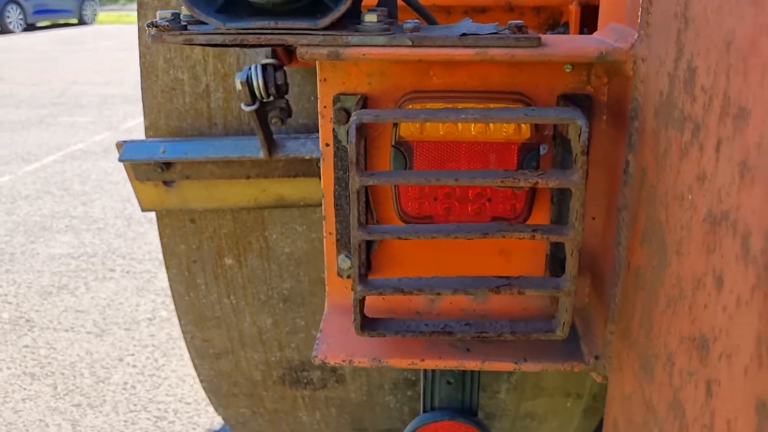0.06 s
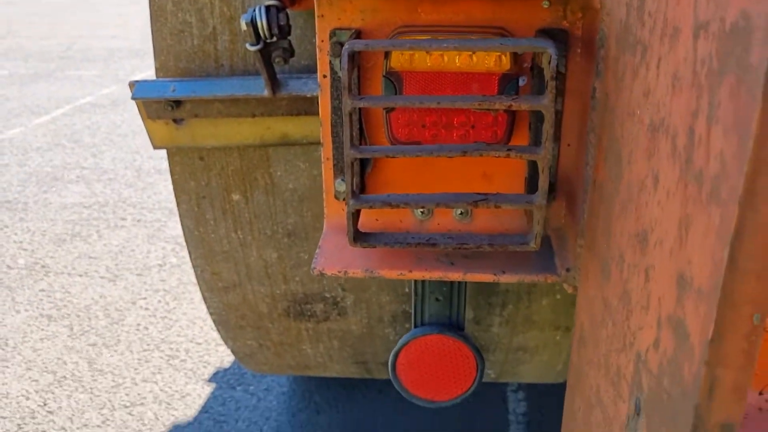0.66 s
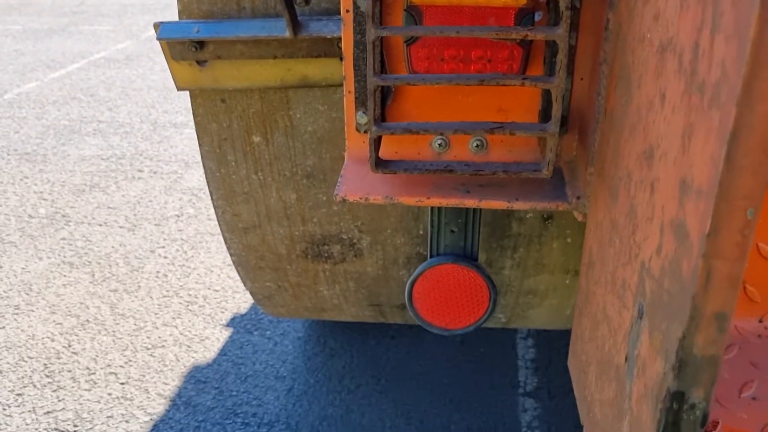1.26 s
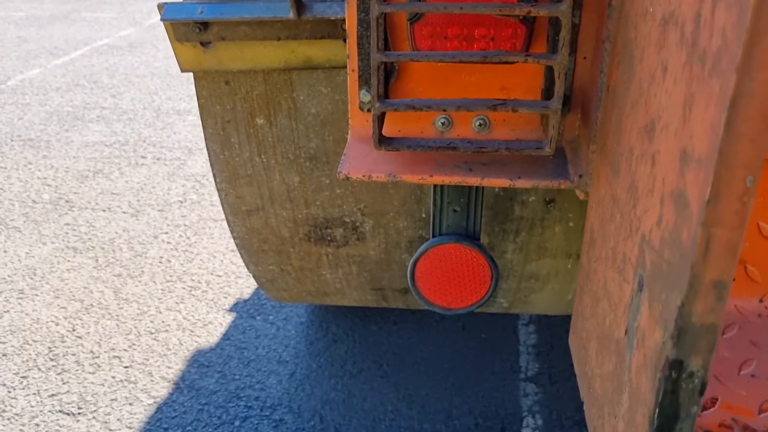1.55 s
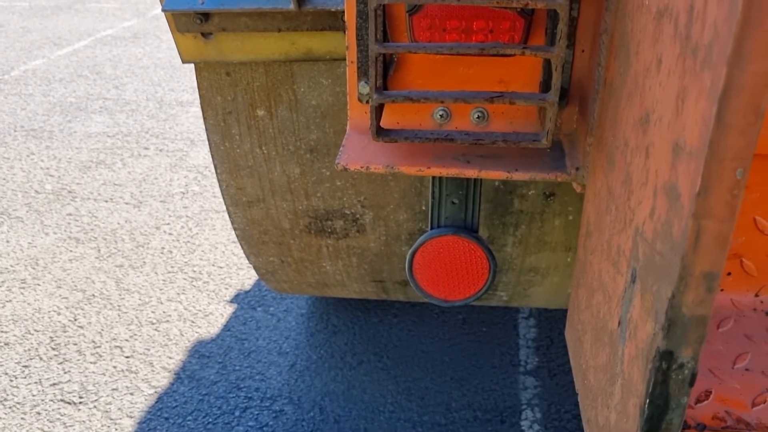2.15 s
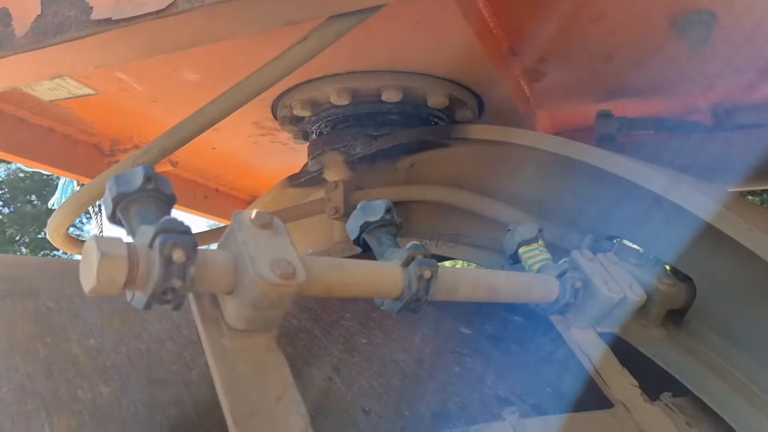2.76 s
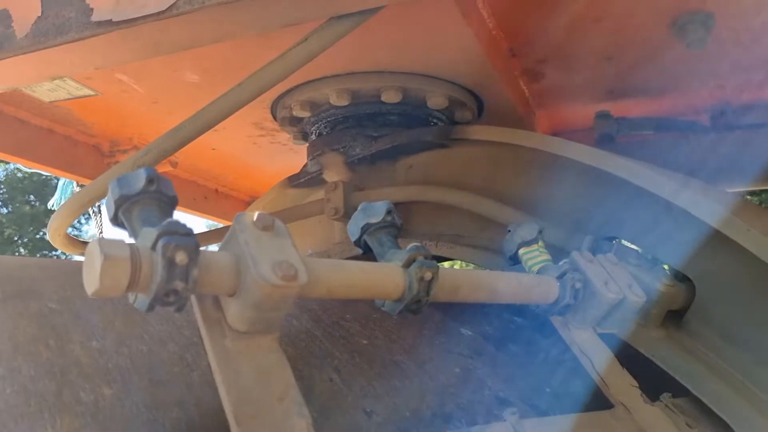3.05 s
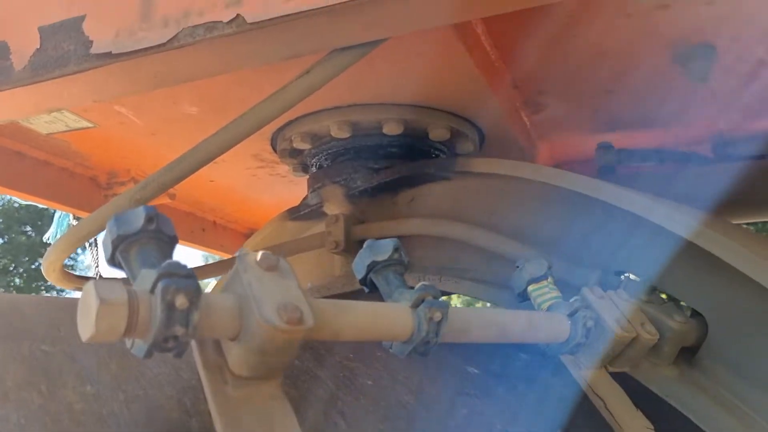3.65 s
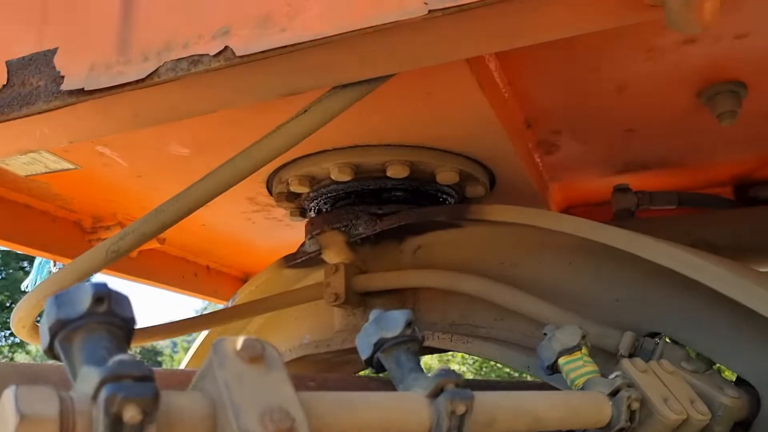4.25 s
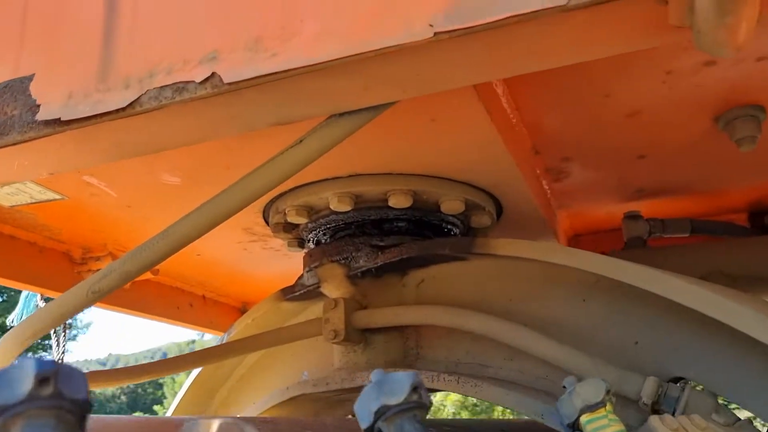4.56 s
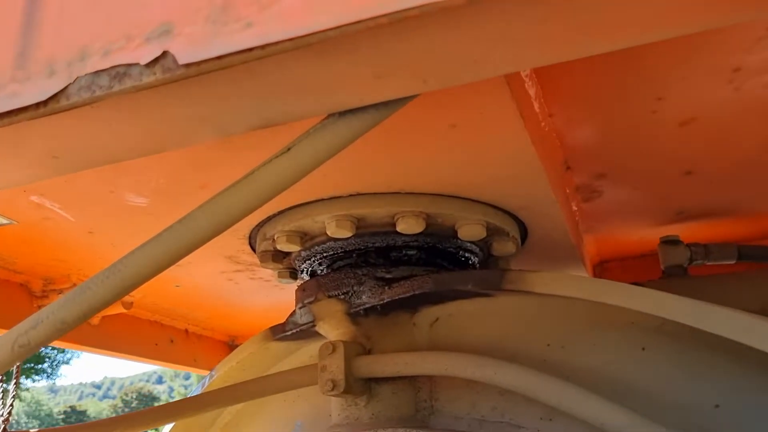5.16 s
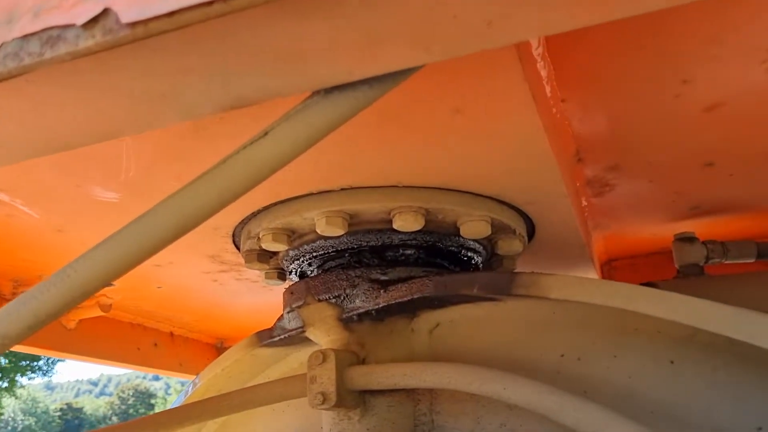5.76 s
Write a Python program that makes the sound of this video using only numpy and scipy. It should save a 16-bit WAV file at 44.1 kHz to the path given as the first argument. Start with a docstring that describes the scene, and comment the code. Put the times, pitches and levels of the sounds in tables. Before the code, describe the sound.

Close beside a road roller outdoors, its diesel engine idles with a throbbing rumble, light metallic knocking and a wavering fan whine. A faint whistle falls, and air hisses briefly. Just before halfway, a click cuts to beneath the frame, where the idle is duller and quieter. Its drone gradually swells as an airy rush grows brighter and rings in the steel cavities.

```python
"""A road roller's diesel engine idles outdoors: its firings make low tones, a roar and a metallic knock.
First we listen beside the drum, with a wavering fan tone, a thin falling whistle and a short hiss of air.
Then the scene changes with a click and we are under the frame. Here the idle is sheltered and dull, with
a swelling drone, while an airy rush grows, brightens and rings in the steel cavities."""
import sys
import numpy as np
from scipy import signal
from scipy.fft import rfft, irfft, next_fast_len
from scipy.io import wavfile

SR = 44100
rng = np.random.default_rng(int(sys.argv[2]) if len(sys.argv) > 2 else 0)


def store_pcm(level_fs):
    """Save levels as 16-bit WAV."""
    pcm = np.round(np.clip(level_fs, -1, 1) * 32767).astype(np.int16)
    wavfile.write(sys.argv[1], SR, np.atleast_2d(pcm).T)


N = 256220
TIME = np.arange(N) / SR
SIZE = next_fast_len(N)
HZ = np.maximum(np.arange(SIZE // 2 + 1) * SR / SIZE, 1)   # the frequencies of a spectrum
CRANK_HZ = 15.27   # engine turns per second at idle
CHANGE_S = 2.7345   # when the scene changes


def engine_beside(crank, gain, ears):
    """The exhaust pulses at multiples of the engine speed, over a rumble and a throbbing roar."""
    # Each row: multiple of the engine speed, starting level in dB, change in dB per second.
    exhaust_tones = [(3, -43, 0.3), (4.5, -43.5, 1), (7.5, -52, 2.5), (9, -39.5, -0.76), (14, -49.5, 3)]
    # Surges of the sixth multiple. Each row: peak time in seconds, length in seconds, level in dB.
    surges = [(.06, 0.047, -26.5), (.6, 0.1, -30), (1.09, 0.16, -34), (1.93, 0.09, -30),
              (2.14, 0.083, -32.5), (2.56, 0.2, -30.5)]
    # Each row of both: frequency in Hz, relative level in dB.
    rumble_colour = [(20, -26.5), (39, -17.5), (50, -0.5), (75, -1.5), (105, -3.5), (150, -6), (185, -6.5),
                     (215, -4.5), (245, -11), (270, -16), (330, -38.5)]
    roar_colour = [(230, -26.5), (290, -5), (340, -2.5), (430, 0.5), (560, 2.5), (680, -9.5), (820, -8.5),
                   (1100, -31)]
    hum = sum(ramp(level) * tone(multiple * crank, waver_db=2.5, blur_rad=0.26, rate_hz=3.8)
              for multiple, *level in exhaust_tones)
    surge = np.hypot(from_db(-41), bursts(surges, rise_db_per_s=70, fall_db_per_s=70))
    throb = surge * tone(6 * crank, waver_db=1.5, blur_rad=0.33, rate_hz=18)
    heave = rms_one(surge ** 0.091)   # the rumble follows the surges slightly
    rumble = gain["rumble"] * heave * noise(colour(rumble_colour), ears)
    roar = gain["roar"] * noise(colour(roar_colour), ears) * firing(crank, depth=0.17, count=3)
    return hear(hum + throb, ears) + rumble + roar


def engine_under(crank, gain, rush_db, ears):
    """The sheltered engine drones, makes the frame buzz and builds to a steady boom."""
    # Each row of both: multiple of the engine speed, relative level in dB.
    drone_tones = [(2, -8.5), (4, -17), (6, -0.5), (8, -6.5)]
    buzz_tones = [(12, -13), (14, -17), (15, -6.5), (16, -11), (22, -7.5), (24, -15.5), (34, -14),
                  (46, -6.5), (50, -22)]
    # Each row of both: frequency in Hz, relative level in dB.
    rumble_colour = [(20, -28), (39, -6), (54, 0.5), (66, 0.5), (82, 3), (112, 0), (140, -8), (170, -11),
                     (200, -29), (280, -38)]
    roar_colour = [(170, -13), (230, -1), (285, -12), (335, 0.5), (400, -8.5), (460, -5), (510, -3.5),
                   (570, -6.5), (690, -2.5), (800, -4.5), (1100, -23)]
    roar_gain = np.hypot(gain["roar"], from_db(rush_db + 12))   # roar and buzz grow with the rush
    drone = sum(from_db(db) * tone(multiple * crank, waver_db=2, blur_rad=0.62, rate_hz=2.2)
                for multiple, db in drone_tones)
    buzz = sum(from_db(db) * tone(multiple * crank, waver_db=4, blur_rad=0.4, rate_hz=3)
               for multiple, db in buzz_tones)
    boom = from_db(-41 - 7 * until(5.38)) * tone(10 * crank, waver_db=1, blur_rad=0.29, rate_hz=1.9)
    exhaust = hear(gain["drone"] * drone + roar_gain * buzz + boom, ears)
    rumble = gain["rumble"] * noise(colour(rumble_colour), ears)
    roar = roar_gain * noise(colour(roar_colour), ears) * firing(crank, depth=0.065, count=2)
    return exhaust + rumble + roar


def firing(crank, depth, count):
    """A gain that swells with each firing, count times per engine turn."""
    return 1 + depth * np.cos(2 * np.pi * count * crank)


def knocks(crank, decay_s, count, depth=0.28, uneven_db=3):
    """A gain that jumps as each firing jolts the metal, some harder than others."""
    stroke, progress = np.divmod(count * crank, 1)
    strength = from_db(uneven_db * rng.standard_normal(size=400))[stroke.astype(int)]
    return rms_one(1 + depth * strength * np.exp(-progress / (count * CRANK_HZ * decay_s)))


def diesel_chatter(crank, gain, ears):
    """Engine parts hiss and chatter with the diesel knock; a few clacks stand out."""
    # Each row: frequency in Hz, relative level in dB.
    hiss_colour = [(700, -29), (950, 2), (1150, -2), (1350, -5), (1700, -10.5), (2300, -20), (3200, -16),
                   (4500, -26.5), (7000, -33.5), (8500, -44), (10000, -49), (15000, -53.5)]
    # Each row: time in seconds, level in dB.
    clack_times = [(0.199, -55), (0.266, -57), (0.296, -56), (0.484, -59), (0.712, -55), (1.248, -56),
                   (1.82, -57), (2.27, -56), (2.468, -54.5)]
    knock = knocks(crank, decay_s=0.007, count=3)
    hiss = gain["hiss"] * noise(colour(hiss_colour), ears) * knock ** 0.7
    clacks = bursts([(s, 0.0044, db) for s, db in clack_times], rise_db_per_s=1105.5, fall_db_per_s=1105.5)
    chatter = (gain["chatter"] * knock ** 2 + clacks) * noise(resonance(hz=1850, width_hz=540), ears)
    return hiss + chatter


def drum_swell(ears):
    """The middle range of the roar opens up as the drum comes near, then holds."""
    # Each row: frequency in Hz, relative level in dB.
    swell_colour = [(290, -12), (340, -2), (430, 0), (480, -8.5), (570, 8.5), (650, -4.5), (850, -6.5),
                    (1100, -6.5), (1400, -14.5), (2200, -29)]
    return from_db(-36 - 12 * until(2.655)) * noise(colour(swell_colour), ears)


def panel(ears):
    """A panel rings with the roar, then fades as the listener sinks."""
    return from_db(-53.5 - 12.5 * since(0.69)) * noise(resonance(hz=695, width_hz=150), ears)


def fan(ears):
    """Cooling fan blades whine on a tone and its octave, roughened by the air they churn."""
    # Each row: time in seconds, pitch of the octave in Hz, level of the lower tone in dB.
    fan_course = [(0.0, 470.7, -45), (0.85, 476.5, -39), (1.4, 473.3, -43), (2.3, 466.7, -45.5),
                  (2.7, 470, -42)]
    # Each row: time in seconds, level of the octave in dB.
    octave_levels = [(0.0, -39), (0.58, -30), (1.0, -36.5), (1.1, -32), (1.18, -42.5), (1.28, -31),
                     (1.7, -53), (2.28, -49.5), (2.4, -38.5), (2.7, -38)]
    octave_hz, blade_db = read(fan_course)
    octave_db, = read(octave_levels)
    cycles = np.cumsum(octave_hz / 2) / SR
    blade = from_db(blade_db) * tone(cycles, waver_db=1.5, blur_rad=0.047, rate_hz=1.6)
    octave = from_db(octave_db) * tone(2 * cycles, waver_db=1.5, blur_rad=0.74, rate_hz=7.5)
    return hear(blade + octave, ears)


def rush(rush_db):
    """An airy rush sets the steel cavities ringing."""
    # Each row: frequency in Hz, relative level in dB.
    rush_colour = [(1500, -13), (2200, -5.5), (2700, -9.5), (3300, -5), (4200, -11), (5050, -3.5),
                   (5400, -3.5), (6100, -15), (7300, -9), (8300, -18), (11000, -21), (15500, -21)]
    # Each row: ringing pitch in Hz, width in Hz, boost in dB.
    steel_rings = [(1170, 50, 26), (1340, 44, 23), (1700, 34, 11), (2156, 24, 15), (2350, 44, 9),
                   (2464, 40, 11), (2580, 60, 6), (2900, 40, 7), (3110, 50, 4), (3955, 24, 11),
                   (4130, 44, 14), (4294, 30, 9), (4300, 450, 2), (5503, 24, 6), (5676, 24, 9),
                   (5900, 600, 2.5), (6130, 30, 12), (6950, 140, 4)]
    # Each row: frequency in Hz, likeness of the ears (0-1), left lead in radians, left over right in dB.
    stereo = [(1200, .85, 3.5, -1), (2050, .7, 6.3, -1.5), (2750, .78, 9.2, -1), (3300, .35, 10.3, -1),
              (4100, .65, 12.6, -1.3), (5100, .72, 15.7, -1), (6100, .65, 18.8, -1), (7100, .6, 21.9, -1),
              (16000, .45, 48, -1.2)]
    steel = 1 + sum((from_db(db) - 1) * resonance(hz, width) for hz, width, db in steel_rings)
    return from_db(rush_db + 15.5) * noise(colour(rush_colour) * steel, ear_gains(stereo))


def flares(ears):
    """One gap in the frame after another catches the rush and rings at its own pitch."""
    # Each row: peak time in seconds, length in seconds, level in dB, pitch in Hz, width in Hz.
    gaps = [(4.0, 0.02, -65, 2450, 400), (4.32, 0.25, -63.5, 2580, 240), (4.5, 0.055, -58.5, 2480, 300),
            (4.42, 0.43, -60.5, 2330, 380), (4.767, 0.017, -54.5, 2420, 240), (4.6, 0.6, -68, 4200, 700),
            (5.2, 0.08, -68, 4150, 200), (4.95, 0.22, -63, 1880, 350), (5.33, 0.12, -55, 4210, 110),
            (5.55, 0.11, -54, 4120, 130), (5.35, 0.2, -59, 2360, 240)]
    return sum(bursts([burst], rise_db_per_s=128, fall_db_per_s=112) * noise(resonance(hz, width), ears)
               for *burst, hz, width in gaps)


def hollow():
    """The hollow under the frame murmurs, then sings a rough, airy tone that grows and sinks in pitch."""
    # One row: frequency in Hz, likeness of the ears (0-1), left lead in radians, left over right in dB.
    stereo = [(670, 1, 1.6, 0)]
    start_s, idle_db = 5.28, -67.5
    hz = 697 - 100 * since(start_s)
    sing_db = -54 + 19.5 * since(start_s) - 60 * until(start_s)
    sing = from_db(sing_db) * tone(np.cumsum(hz) / SR, waver_db=3.5, blur_rad=0.5, rate_hz=20)
    murmur_gain = np.hypot(from_db(idle_db), from_db(sing_db - 3.5))
    murmur = murmur_gain * np.array([narrow_noise(hz, width_hz=134) for ear in "LR"])
    return murmur + hear(sing, ear_gains(stereo))


def high_hisses(ears):
    """A short hiss of escaping air; later, a brief high hiss just before the click at the scene change."""
    # Each row: peak time in seconds, length in seconds, level in dB. Only the first two are escaping air.
    hisses = [(2.02, 0.58, -72), (2.16, 0.16, -59.5), (2.7, 0.026, -60)]
    # Each row: frequency in Hz, relative level in dB.
    hiss_colour = [(2200, -8), (3000, 19.5), (4300, -5), (6000, 3), (8400, -5), (10000, -14), (10900, -6),
                   (11250, 6), (11700, -8), (12200, -11), (14000, -11), (16000, -14)]
    return bursts(hisses, rise_db_per_s=221, fall_db_per_s=135) * noise(colour(hiss_colour), ears)


def rasps(ears):
    """Short, grainy scrapes of treble."""
    # Each row: peak time in seconds, length in seconds, level in dB.
    scrapes = [(4.37, 0.015, -62), (4.695, 0.027, -59.5), (5.35, 0.036, -52)]
    # Each row: frequency in Hz, relative level in dB.
    rasp_colour = [(3500, -3), (4300, 11), (6300, -1), (9000, -13)]
    grain = rms_one(from_db(3.5 * drift(rate_hz=130)))
    return bursts(scrapes, rise_db_per_s=450, fall_db_per_s=450) * grain * noise(colour(rasp_colour), ears)


def whistle():
    """A soft, airy whistle holds its pitch, runs down, and sounds clearly just before it stops."""
    start_hz, floor_hz, stop_db_per_s = 12000, 5400, 91.5
    falling_s = since(0.97)
    hz = floor_hz + (start_hz - floor_hz) * np.exp(-falling_s / 1.62)
    airy = from_db(-82 - 4.5 * falling_s + 1.5 * drift(rate_hz=12) - stop_db_per_s * since(2.36))
    clear = bursts([(2.23, 0.04, -74)], stop_db_per_s, stop_db_per_s)
    return np.array([airy * (narrow_noise(hz, width_hz=450) + narrow_noise(hz, width_hz=1600))
                     + clear * narrow_noise(hz, width_hz=90) for ear in "LR"])


def beside_drum(crank):
    """All that is heard beside the drum; the listener sinks slowly, so the layers change evenly."""
    # Each row: frequency in Hz, likeness of the ears (0-1), left lead in radians, left over right in dB.
    stereo = [(30, .98, .1, -2.2), (110, .96, .1, -2.2), (150, .8, 0, -2), (185, .55, .3, -3),
              (235, .82, 1.1, -5.5), (290, .55, 2.4, 2), (345, .5, .3, 8), (430, .88, .5, 3),
              (475, .97, .5, -5), (540, .88, 2.3, -3), (680, .9, 2.6, 2), (800, .6, 1.5, 1),
              (930, .9, 2.8, -1), (1500, .88, 3.7, -2), (2150, .5, 6.3, -1), (3200, .42, 9.7, 1),
              (16000, .5, 48.5, -1.5)]
    # Each layer: starting level in dB, change in dB per second.
    levels = {"rumble": (-38.5, 2.06), "roar": (-35.5, -2.76), "hiss": (-51, -0.46), "chatter": (-65, -1.2)}
    ears = ear_gains(stereo)
    gain = {layer: ramp(level) for layer, level in levels.items()}
    body = engine_beside(crank, gain, ears) + panel(ears) + drum_swell(ears)
    treble = echoes(diesel_chatter(crank, gain, ears) + high_hisses(ears), wet=0.23, sway_ms=0.18, count=6)
    return body + treble + fan(ears) + whistle()


def under_frame(crank):
    """All that is heard under the frame; the layers grow as the listener rises out of shelter."""
    # Each row: frequency in Hz, likeness of the ears (0-1), left lead in radians, left over right in dB.
    stereo = [(30, .9, 0, -2), (45, .6, .3, 2), (65, .87, .2, 0), (92, .97, .4, -1), (120, .78, .6, -1),
              (152, .92, .5, -2), (185, .87, .5, 0), (240, .94, .6, -3), (290, .55, 1.3, -2),
              (340, .63, 2, -1), (470, .6, 1.6, 0), (620, .82, 2.7, 0), (1400, .84, 3.6, -1),
              (2150, .58, 6.3, -1.5), (4200, .48, 12.6, -1.3), (16000, .45, 48, -1.2)]
    # Each layer: level in dB at the scene change, change in dB per second.
    levels = {"drone": (-50, 2.24), "rumble": (-46.5, 0.83), "roar": (-62, 4.03), "hiss": (-60, 2.94)}
    # Each row: time in seconds, relative strength of the rush in dB.
    rush_levels = [(2.8, -107), (3.01, -107), (4.39, -78.5), (5.09, -78), (5.25, -71.5), (5.34, -65.5),
                   (5.6, -60), (5.73, -61), (5.81, -64)]
    # Each row: frequency in Hz, relative level in dB.
    hiss_colour = [(700, -10), (950, -1.5), (1350, -1), (1700, -8.5), (2500, -9), (3300, -9), (4300, -16),
                   (6000, -20), (7600, -25), (8500, -41.5), (12000, -49), (15000, -53)]
    ears = ear_gains(stereo)
    gain = {layer: ramp(level, CHANGE_S) for layer, level in levels.items()}
    rush_db, = read(rush_levels)
    engine = engine_under(crank, gain, rush_db, ears)
    hiss = gain["hiss"] * noise(colour(hiss_colour), ears)
    clatter = knocks(crank, decay_s=0.009, count=2)
    treble = echoes(hiss + clatter * rush(rush_db), wet=0.33, sway_ms=0.25, count=8)
    treble += clatter * flares(ears) + rasps(ears)
    return engine + hollow() + treble * from_db(0.44 * drift(rate_hz=12))   # the treble flickers


def echoes(x, wet, sway_ms, count):
    """Sound bounces off nearby steel plates; the short delays shift as the listener sways."""
    sway = sway_ms * drift(rate_hz=0.45)
    lags_ms = rng.uniform(1.5, 9, count)
    directions = rng.uniform(-1, 1, count)
    signs = rng.choice([-1, 1], count)
    out = x
    for lag_ms, towards, sign in zip(lags_ms, directions, signs):
        sent_s = TIME - (lag_ms + towards * sway) / 1000
        out = out + sign * wet / np.sqrt(count) * np.array([np.interp(sent_s, TIME, side) for side in x])
    return out / np.sqrt(1 + wet ** 2)


def ear_gains(stereo):
    """Left and right gains for direct sound, and for scattered sound that the ears do not share."""
    alike, lead, balance_db = read(stereo, HZ)
    alike = np.clip(alike, 0, 1)
    sides = np.array([from_db(balance_db / 2), from_db(-balance_db / 2) * np.exp(-1j * lead)])
    direct = sides * np.sqrt((1 + alike) / 2)
    scattered = sides * np.sqrt((1 - alike) / 2) * [[1], [-1]]
    return direct, scattered


def hear(x, ears):
    """Sound from one spot goes straight to both ears."""
    return irfft(ears[0] * rfft(x, SIZE), SIZE)[:, :N]


def tone(cycles, waver_db, blur_rad, rate_hz):
    """A tone whose strength and phase waver on the way through moving air."""
    strength = np.sqrt(2) * rms_one(from_db(waver_db * drift(rate_hz)))
    return strength * np.sin(2 * np.pi * cycles + blur_rad * drift(rate_hz))


def noise(gain, ears):
    """Shaped stereo noise; the audible part that both ears share has a strength of 1."""
    spectrum = gain * sum(path * rfft(rng.standard_normal(SIZE)) for path in ears)
    common = irfft(spectrum.mean(axis=0) * (HZ > 20) * (HZ < 16000), SIZE)
    return irfft(spectrum, SIZE)[:, :N] / common.std()


def narrow_noise(hz, width_hz):
    """A narrow band of noise around a moving pitch."""
    phase = 2 * np.pi * np.cumsum(hz) / SR
    return drift(width_hz / 2) * np.cos(phase) + drift(width_hz / 2) * np.sin(phase)


def colour(points):
    """Gain at every frequency from a few points, falling 24 dB per octave past the ends."""
    hz, db = np.transpose(points)
    octaves_beyond = np.maximum(np.log2(HZ / hz[-1]), 0) + np.maximum(np.log2(hz[0] / HZ), 0)
    return from_db(np.interp(np.log(HZ), np.log(hz), db) - 24 * octaves_beyond)


def resonance(hz, width_hz):
    """A peak of gain around one ringing pitch, 1 on top."""
    return 1 / (1 + ((HZ ** 2 - hz ** 2) / (HZ * width_hz)) ** 2)


def drift(rate_hz):
    """A smooth random wobble with a spread of 1."""
    spectrum = rfft(rng.standard_normal(SIZE // 8))
    return rms_one(irfft(spectrum / (1 + (HZ[:len(spectrum)] / rate_hz) ** 4), SIZE)[:N])


def bursts(rows, rise_db_per_s, fall_db_per_s):
    """Gain of events that rise to a peak, hold and die away."""
    return np.max([from_db(db - rise_db_per_s * until(peak_s) - fall_db_per_s * since(peak_s + hold_s))
                   for peak_s, hold_s, db in rows], axis=0)


def ramp(level, start_s=0):
    """Gain that changes evenly in decibels."""
    db, db_per_s = level
    return from_db(db + db_per_s * since(start_s))


def read(rows, at=TIME):
    """Each later column of a table, joined by straight lines along the first."""
    first, *columns = np.transpose(rows)
    return [np.interp(at, first, column) for column in columns]


def since(start_s):
    """Seconds since a moment, 0 before it."""
    return np.maximum(TIME - start_s, 0)


def until(end_s):
    """Seconds left until a moment, 0 after it."""
    return np.maximum(end_s - TIME, 0)


def from_db(db):
    """Decibels to gain."""
    return 10 ** (np.asarray(db) / 20)


def rms_one(x):
    """Scale to an average strength (rms) of 1."""
    return x / np.sqrt(np.mean(x ** 2))


def scene():
    """One engine drives both scenes; in the second it starts a little faster and settles."""
    extra_hz = (TIME > CHANGE_S) * 0.55 * np.exp(-since(CHANGE_S) / 0.99)
    speed_hz = (CRANK_HZ + extra_hz) * (1 + 0.0026 * drift(rate_hz=2.8))
    crank = np.cumsum(speed_hz) / SR   # engine turns so far
    click = np.exp(-np.abs(TIME - CHANGE_S) / 0.001)   # the pressure jumps as the scene changes
    first = (1 - click) * beside_drum(crank) - click * from_db(-20.5)
    return np.where(TIME < CHANGE_S, first, under_frame(crank))


def record(dry):
    """Cut the highest treble steeply."""
    cutoff_hz = 15900
    return signal.sosfilt(signal.ellip(10, .1, 80, cutoff_hz, fs=SR, output="sos"), dry)


dry = scene()
out = record(dry)
store_pcm(out)
```